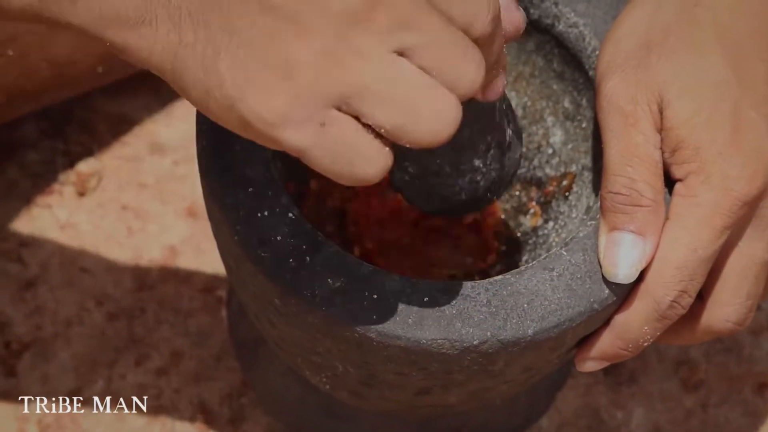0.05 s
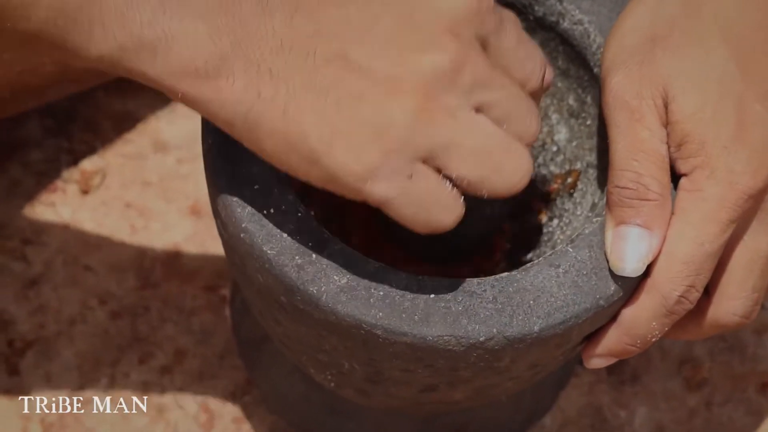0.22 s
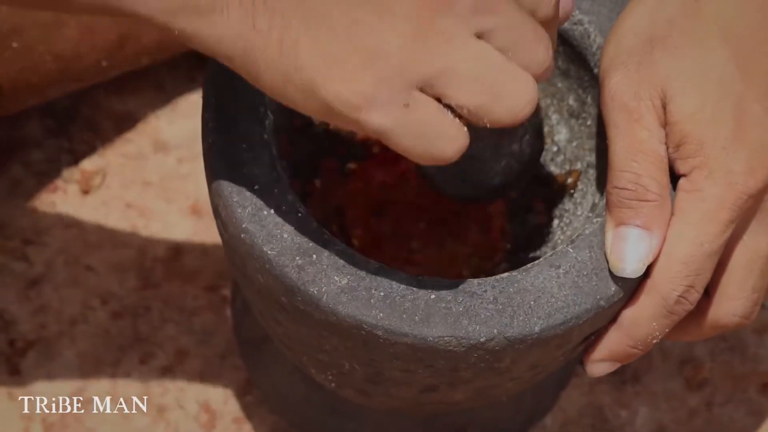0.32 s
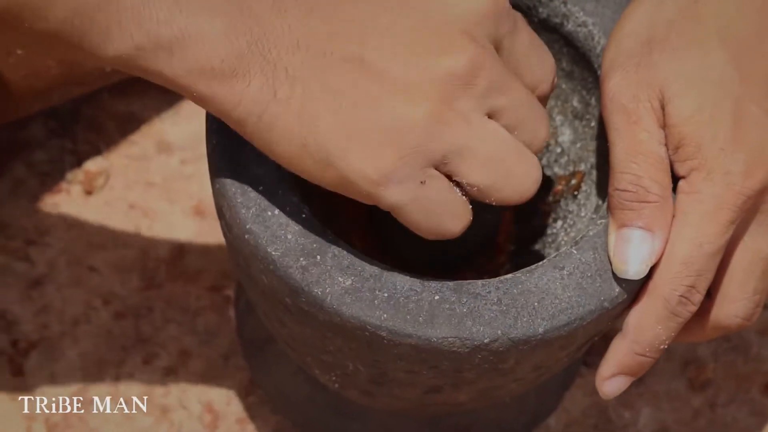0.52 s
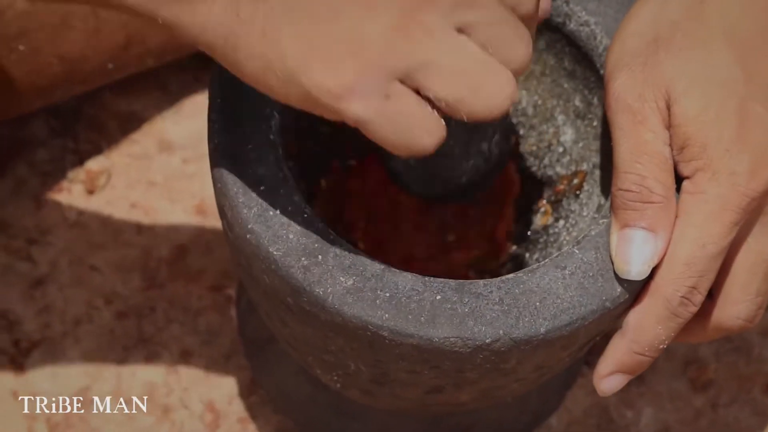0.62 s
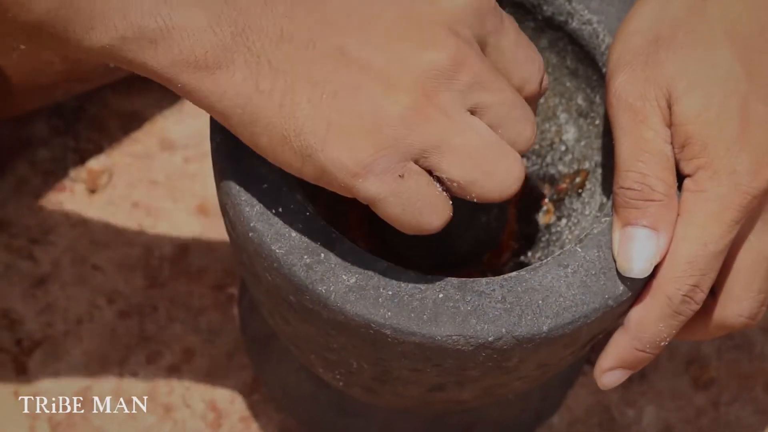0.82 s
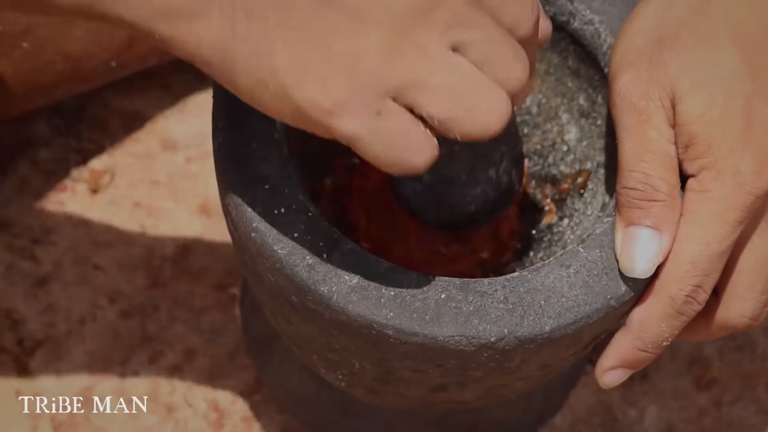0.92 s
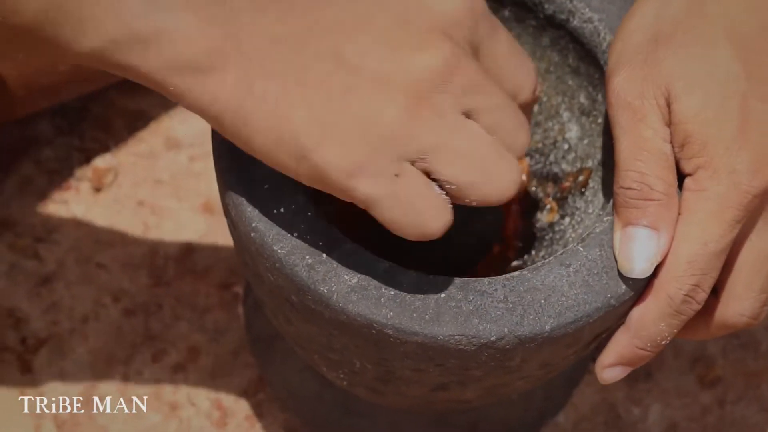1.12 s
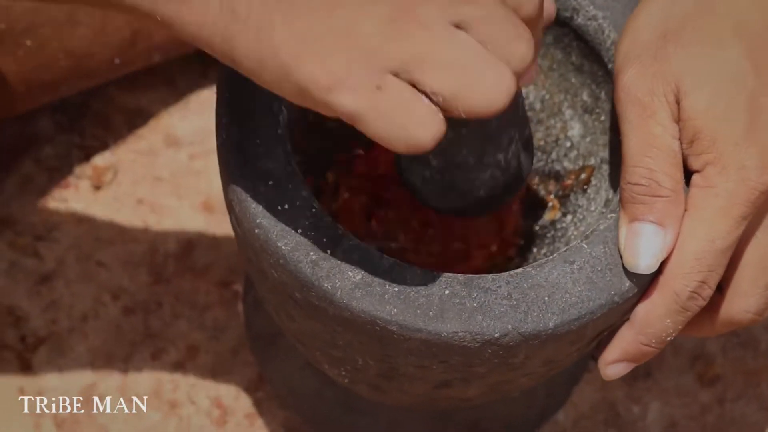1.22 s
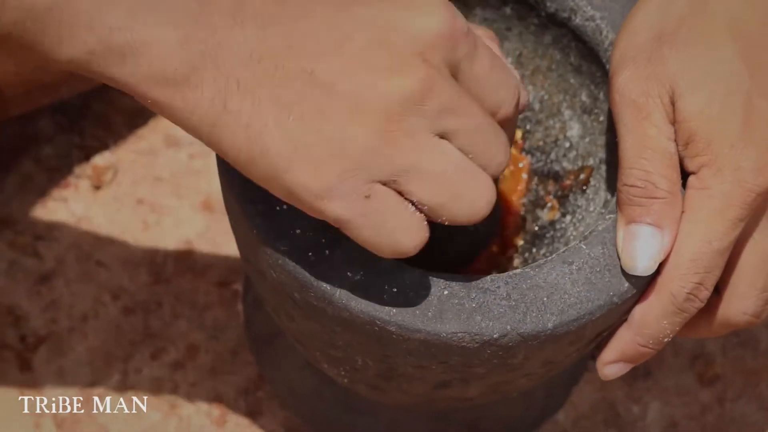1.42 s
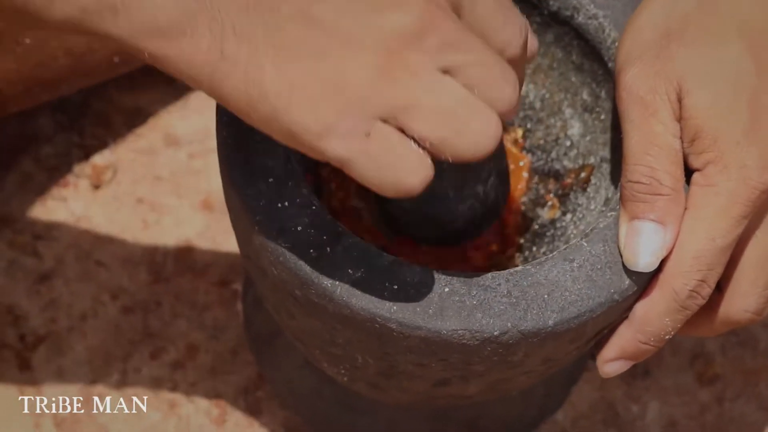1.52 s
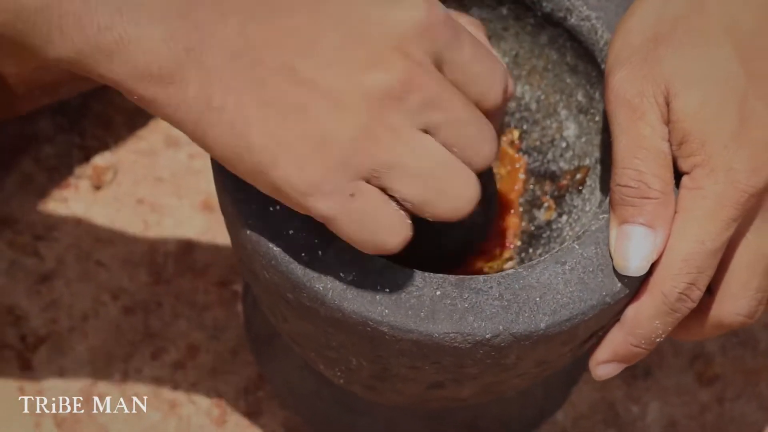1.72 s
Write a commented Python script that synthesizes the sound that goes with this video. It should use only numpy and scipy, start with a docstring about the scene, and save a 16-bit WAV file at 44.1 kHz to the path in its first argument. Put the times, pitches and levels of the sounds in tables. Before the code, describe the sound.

A stone pestle strikes wet paste in a stone mortar five times at an even pace, the first blow sharp and loud, later ones duller and squelchy; close stereo microphone outdoors, faint insect behind.

```python
"""Pestle and mortar outdoors

A stone pestle pounds wet spice paste in a stone mortar five times, close to a microphone with two ports.
Each blow rings the bowl as dying sines, thumps the ground and adds noise bursts of stone crunch and paste.
The paste smacks in swells of crackle as the pestle lifts, and bubbles burst as short tones with a snap.
Slow pulses make the low thud of the first blow and soft puffs of air at the ports.
Behind lie outdoor noise and a distant insect made of narrow noise."""
import sys
import numpy as np
from scipy import signal
from scipy.fft import rfft, irfft
from scipy.io import wavfile

SR = 44100
rng = np.random.default_rng(int(sys.argv[2]) if len(sys.argv) > 2 else 0)


def transcribe(u):
    """Save the signal u as a 16-bit wav file named by the first command-line argument.

    u: samples, shape (n,) or (channels, n), limited to [-1, 1]; the rate is SR.
    q: integer samples, one column per channel.
    """
    v = np.clip(np.atleast_2d(u).T, -1, 1)
    q = np.round(v * 32767).astype(np.int16)
    wavfile.write(sys.argv[1], SR, q)


N = 77175


def amp(db):
    """Amplitude of a level in dB."""
    return 10 ** (np.asarray(db) / 20)


def unit(x):
    """Scale to an RMS of one over all channels."""
    return x / np.sqrt(np.mean(x ** 2) + 1e-20)


def read(points, hz):
    """Interpolate a frequency table on a log-frequency axis."""
    f, value = np.transpose(points)
    return np.interp(np.log(hz + 1), np.log(f + 1), value)


def add(mix, s, sound):
    """Lay a sound into the mix from s seconds on, cut at the end."""
    part = mix[..., round(s * SR):][..., :sound.shape[-1]]
    part += sound[..., :part.shape[-1]]


def clock(n):
    """Time in seconds of n samples."""
    return np.arange(n) / SR


def crackle(spectrum, tilt_db, grain_db, spread, size=8192):
    """Dense noise of uneven grain with a given colour; spread sets how far the channels differ."""
    hz = np.fft.rfftfreq(size, 1 / SR)
    grain = amp(grain_db * np.minimum(rng.exponential(1, size), 4))
    z = rng.standard_normal((2, size)) * grain
    octaves = np.log2(np.maximum(hz, 500) / 500)
    colour = amp(read(spectrum, hz) + tilt_db * octaves)
    low_cut = hz / (hz + 100)
    middle, side = irfft(rfft(z) * colour * low_cut)
    return unit(np.array([middle + spread * side, middle - spread * side]))


def ring(modes, t, ratio):
    """Sum of dying sines, each falling 60 dB in its t60, all shifted by one pitch ratio."""
    return sum(amp(db - 60 * t / t60) * np.sin(2 * np.pi * hz * ratio * t) for hz, db, t60 in modes)


# colour of the open air: (frequency [Hz], relative level [dB])
AIR_COLOUR = [(15, -42.5), (25, -14.5), (80, -3), (102, -8.5), (127, -11), (301, -13.5), (394, -17),
              (439, -15.5), (818, -19), (1290, -21), (2110, -27), (5280, -29.5), (16000, -41)]
# how alike the air is at the left and right ports: (frequency [Hz], likeness [0 to 1])
AIR_LIKENESS = [(60, 0.57), (240, 0.5), (950, 0.26), (3770, 0.082), (15000, 0.23)]
# faint steady bands behind the mortar: (frequency [Hz], width at half amplitude [Hz], level [dB])
STEADY_BANDS = [(83.2, 22, -58.5), (5290, 330, -66)]
AIR_DB, DRIFT_DB = -49, .4


def air():
    """Outdoor rumble and hiss: coloured noise that drifts slightly, plus faint steady bands."""
    hz = np.fft.rfftfreq(N, 1 / SR)
    a, b, c, d = rfft(rng.standard_normal((4, N)))
    same = read(AIR_LIKENESS, hz)

    def pair(p, q):
        """Two channels that share part of their noise."""
        return np.array([p, same * p + np.sqrt(1 - same ** 2) * q])

    drift = unit(irfft(rfft(rng.standard_normal(N)) * np.exp(-hz / 8), N))
    wash = unit(irfft(pair(a, b) * amp(read(AIR_COLOUR, hz)), N))
    out = amp(AIR_DB + DRIFT_DB * drift) * wash
    for centre, width, db in STEADY_BANDS:
        band = pair(c, d) / (1 + (2 * (hz - centre) / width) ** 2)
        out += amp(db) * unit(irfft(band, N))
    return out


# first syllable of each chirp of the distant insect: (time of its peak [s])
CHIRP_TIMES = [.135, .340, .550, .760, .942, 1.361, 1.530, 1.700]
CHIRP_HZ, CHIRP_WIDTH_HZ, CHIRP_DB = 8950, 110, -66
SYLLABLE_GAP_S, SYLLABLE_S = .045, .013


def insect():
    """A thin, high band of noise gated into two soft syllables per chirp."""
    hz, t = np.fft.rfftfreq(N, 1 / SR), clock(N)
    band = np.exp(-((hz - CHIRP_HZ) / CHIRP_WIDTH_HZ) ** 2)
    tone = unit(irfft(rfft(rng.standard_normal((2, N))) * band, N))
    gate = np.zeros(N)
    for s in CHIRP_TIMES:
        for start in (s, s + SYLLABLE_GAP_S):
            gate += np.exp(-((t - start) / SYLLABLE_S) ** 2 / 2)
    # each port also hears some of the other's noise
    return amp(CHIRP_DB) * gate * (tone + 0.46 * tone[::-1])


# decay of the scatter off the ground nearby: (frequency [Hz], t60 [s])
GROUND_SCATTER = [(200, 0.36), (800, 0.09), (3000, 0.099), (12000, 0.17)]
NEAR_DB, FAR_DB, FAR_T60_S, TAIL_RISE_S = -26, -40, .5, 0.0048


def yard(x):
    """Weak scatter from the ground nearby and a fainter, longer tail, both of dying noise."""
    noise = rng.standard_normal((2, SR // 2))
    hz, t, z = signal.stft(noise, SR, nperseg=256)
    decay = amp(-60 * t / read(GROUND_SCATTER, hz)[:, None])
    near = signal.istft(z * decay, SR, nperseg=256)[1][:, :SR // 2]
    t = clock(SR // 2)
    far = noise[::-1] * amp(-60 * t / FAR_T60_S)
    tail = sum(amp(db) * v / np.linalg.norm(v[0]) for v, db in [(near, NEAR_DB), (far, FAR_DB)])
    tail = tail * np.minimum(t / TAIL_RISE_S, 1)
    return signal.fftconvolve(x, tail, axes=1)[:, :N]


# low thud of the first blow (first row), and slow puffs of air at the ports (the rest):
# (time of the midpoint [s], level [dB], frequency that sets the speed [Hz], side [0 left to 1 right])
THUD_AND_PUFFS = [(.2108, -15.5, 170, 0.487), (0.248, -34, 150, .03), (0.275, -30.5, 92, .03),
                  (0.2877, -25.5, 116, 0.038), (.304, -32.5, 60.5, .03), (.324, -34.5, 55, .03),
                  (.8755, -30, 80, .97)]


def thud_and_puffs():
    """The first blow's low thud and the puffs of air: each one slow push and pull, shared by its side."""
    out = np.zeros((2, N))
    for s, db, hz, side in THUD_AND_PUFFS:
        u = 2 * np.pi * hz * (clock(N) - s)
        push_pull = u * np.exp((1 - u ** 2) / 2)
        out -= amp(db) * np.outer([1 - side, side], push_pull)
    return out


# level of the mortar at the left port over the right: (frequency [Hz], balance [dB])
LEFT_OVER_RIGHT = [(60, -1), (150, -0.5), (380, -1), (950, 1.5), (2380, -4), (5980, -0.5), (15000, -0.5)]
# reflections off the hand and the wall of the bowl: (delay left [s], delay right [s], treble level [dB])
CLOSE_REFLECTIONS = [(.00031, 0.00034, -28.5), (.00118, .00083, -13.5)]
REFLECT_ABOVE_HZ = 4500  # reflections weaken below this


def ports(x):
    """Two microphone ports hear the mortar at slightly different levels, each with close reflections."""
    hz = np.fft.rfftfreq(N, 1 / SR)
    half = amp(read(LEFT_OVER_RIGHT, hz) / 2)
    echoes = np.zeros((2, len(hz)), complex)
    for left, right, db in CLOSE_REFLECTIONS:
        echoes += amp(db) * np.exp(-2j * np.pi * np.outer([left, right], hz))
    treble = hz / np.hypot(hz, REFLECT_ABOVE_HZ)
    return irfft(rfft(x) * np.array([half, 1 / half]) * (1 + echoes * treble), N)


# paste clinging and stone rubbing as the pestle lifts:
# (time of the peak [s], swell [s], fade [s], level [dB], rubbing of the rim over the suction [dB])
PESTLE_LIFTS = [(.290, .014, 0.0177, -49, -4), (0.339, 0.012, 0.0059, -58, 3),
                (.629, 0.017, 0.0089, -47, -26), (0.914, 0.028, 0.022, -49.5, -17),
                (1.22, 0.016, 0.014, -47, -22), (1.534, 0.021, 0.0092, -47.5, -26)]
# colour of the sticky fizz: (frequency [Hz], relative level [dB])
SUCTION_COLOUR = [(500, -34), (1500, -12.5), (2400, -5.5), (3100, -3.5), (4500, -9), (7500, -11),
                  (11000, -18), (16000, -27)]
# colour of stone rubbing on stone: (frequency [Hz], relative level [dB])
RUB_COLOUR = [(300, -21), (780, 0), (1200, -12), (1750, 0.5), (2400, -10.5), (3200, -14), (3375, 5),
              (3560, -11.5), (6000, -25.5), (16000, -46)]
# bubbles bursting in the paste: (time [s], level [dB], frequency [Hz], t60 [s], snap over the tone [dB])
BUBBLE_POPS = [(0.6235, -36, 5450, 0.002, -17), (0.898, -33, 4500, 0.0041, -9),
               (0.9256, -28, 2940, 0.015, -12.5), (1.515, -35, 9600, 0.0036, -25),
               (1.5251, -26, 3200, 0.0075, -16.5), (1.5335, -30.5, 2570, 0.0084, -3),
               (1.5383, -36.5, 3100, .006, 6)]
# colour of the snap of a bubble: (frequency [Hz], relative level [dB])
SNAP_COLOUR = [(500, -35), (1500, -29), (2300, -7), (3500, -4), (5000, -3), (8000, -3.5), (11000, -20.5),
               (16000, -38)]


def lifts():
    """A sticky fizz swells and lets go while stone rubs on stone; a few bubbles burst as tone and snap."""
    out = np.zeros((2, N))
    for s, swell, fade, db, rub_db in PESTLE_LIFTS:
        fizz = crackle(SUCTION_COLOUR, 0, grain_db=2.0, spread=0.65)
        z = fizz + amp(rub_db) * crackle(RUB_COLOUR, 0, grain_db=4.5, spread=.2)
        half = z.shape[1] / SR / 2
        t = clock(z.shape[1]) - half
        envelope = np.exp(-abs(t / np.where(t < 0, swell, fade)) ** 2.4 / 2)
        add(out, s - half, amp(db) * z * envelope)
    for s, db, hz, t60, snap_db in BUBBLE_POPS:
        z = crackle(SNAP_COLOUR, 0, grain_db=0, spread=0.17)
        t = clock(z.shape[1])
        snap = amp(snap_db) * z * np.exp(-t / 0.0018)
        add(out, s, amp(db) * (ring([(hz, 0, t60)], t, 1) + snap))
    return out


# short noise bursts of each blow, stone crunch and wet paste squeezed aside:
# (time [s], length before the fall [s], level [dB], brightness above 500 Hz [dB per octave])
BLOW_BURSTS = [(0.208, 0.0017, -22, -2.5), (.2092, 0.0026, -11.5, -2), (0.216, .012, -37, 0.5),
               (0.2263, 0.0026, -32.5, 0), (.232, 0.007, -47.5, -2.5), (.5232, 0.0025, -28.5, 1.5),
               (0.527, 0.0027, -25, 0.5), (0.53, 0.011, -35, -1.5), (0.5324, 0.0011, -17.5, 2.5),
               (.8370, 0.005, -22, 3.5), (0.8398, 0.0056, -29, 1), (0.847, 0.0043, -23, 0.5),
               (0.852, 0.013, -47, 1.5), (1.1435, 0.0055, -24, 0), (1.153, 0.00071, -23.5, 0.5),
               (1.158, 0.0058, -33, -2.5), (1.161, 0.016, -44, -4), (1.4449, 0.0047, -26, 1),
               (1.449, 0.0051, -32, 10.5), (1.455, 0.016, -37, -0.5)]
# colour of the bursts before that brightness: (frequency [Hz], relative level [dB])
BURST_COLOUR = [(200, -23), (500, -5), (850, 17.5), (1300, -3), (1800, 10), (2400, 4), (3200, 8.5),
                (4500, 2.5), (6500, 7), (10000, -0.5), (13000, -3), (16000, -11.5)]
BURST_RISE_S, BURST_FALL_S, BURST_GRAIN_DB = .0007, 0.0022, 2.2


def blow_bursts():
    """Short noise bursts of each blow: stone crunch and wet paste squeezed aside, as fine crackle."""
    out = np.zeros((2, N))
    for s, length, db, tilt_db in BLOW_BURSTS:
        z = crackle(BURST_COLOUR, tilt_db, grain_db=BURST_GRAIN_DB, spread=0.26)
        t = clock(z.shape[1])
        rise = np.minimum(t / BURST_RISE_S, 1)
        fall = np.exp(-np.maximum(t - length, 0) / BURST_FALL_S)
        add(out, s, amp(db) * z * rise * fall)
    return out


# pestle meeting stone: (time [s], level [dB], clack [dB], rim ring [dB], contact [s],
# pitch ratio of the hollow, pitch ratio of the clack, time until the paste smothers the ring [s])
STONE_KNOCKS = [(.2094, 2, 6.5, 5, 0.00021, 1.03, 0.99, 0.006),
                (.5278, -21.5, 1, -8, 0.00023, 1.05, 0.97, 0.028),
                (0.8389, -5, -23, -20, 0.0015, 0.97, 1.2, 0.0052),
                (1.1481, -2, -8, -46, 0.00012, 0.992, 0.915, 0.0096),
                (1.4483, -3, -3.5, -15, 0.00034, 0.98, 1.022, 0.0072)]
# modes of the hollow of the bowl, before pitch ratio and smothering: (frequency [Hz], level [dB], t60 [s])
HOLLOW_MODES = [(417, -23.5, 0.02), (600, -15, 0.013), (763.5, -1.5, 0.036), (920, -22.5, .035),
                (1080, -9, .011)]
# modes of stone on stone, before pitch ratio and smothering: (frequency [Hz], level [dB], t60 [s])
CLACK_MODES = [(1546, -22, 0.013), (1760, -2, 0.019), (1873, -9, 0.024), (2074, -5, 0.013),
               (2750, -12, 0.021)]
# modes of the rim, never smothered: (frequency [Hz], level [dB], t60 [s])
RIM_MODES = [(2528, -7, 0.0099), (3356, -20, 0.04), (3900, -22.5, 0.011), (5800, -40, 0.0099),
             (7000, -46.5, 0.0085)]
GROUND_HZ, GROUND_T60_S, GROUND_DB, GROUND_LAG_S = 80, .17, -39, .0015
RADIATE_HZ, BUILD_UP_S = 255, 0.00031


def knocks():
    """Blows ring the bowl until the pestle beds into the paste, and thump the ground; long contact dulls."""
    out, t, hz = np.zeros(N), clock(SR // 4), np.fft.rfftfreq(N, 1 / SR)
    # a small body radiates little bass
    small_body = signal.butter(3, RADIATE_HZ, "high", fs=SR, output="sos")
    # the thump is the same under every blow
    thump = ring([(GROUND_HZ, GROUND_DB, GROUND_T60_S)], t, 1)
    for s, db, clack_db, rim_db, contact, hollow_ratio, clack_ratio, smother in STONE_KNOCKS:
        bowl = ring(HOLLOW_MODES, t, hollow_ratio) + amp(clack_db) * ring(CLACK_MODES, t, clack_ratio)
        smothered = bowl * np.exp(-(t / smother) ** 2)
        stone = smothered + amp(rim_db) * ring(RIM_MODES, t, 1)
        blow = np.zeros(N)
        add(blow, s, amp(db) * stone * (1 - np.exp(-t / BUILD_UP_S)))
        softened = irfft(rfft(blow) * np.exp(-(hz * contact) ** 2 / 2), N)
        out += signal.sosfilt(small_body, softened)
        add(out, s + GROUND_LAG_S, thump)
    return out


def scene():
    """The mortar at the ports and in the yard, with thud and puffs, over open air and insect."""
    mortar = knocks() + blow_bursts() + lifts()
    return ports(mortar) + yard(mortar) + thud_and_puffs() + air() + insect()


CLIP_AT, EDGE_HZ = 1.0, 16150


def record(dry):
    """Peaks near full scale overload the input and are rounded off; then the treble is band-limited."""
    held = dry / (1 + (dry / CLIP_AT) ** 10) ** (1 / 10)
    band_limit = signal.firwin(255, EDGE_HZ, window=("kaiser", 8), fs=SR)
    return signal.oaconvolve(held, band_limit[None], "same")


dry = scene()
out = record(dry)
transcribe(out)
```